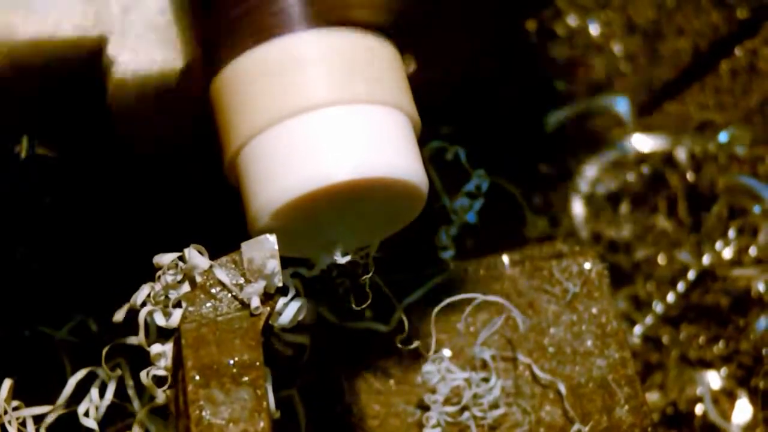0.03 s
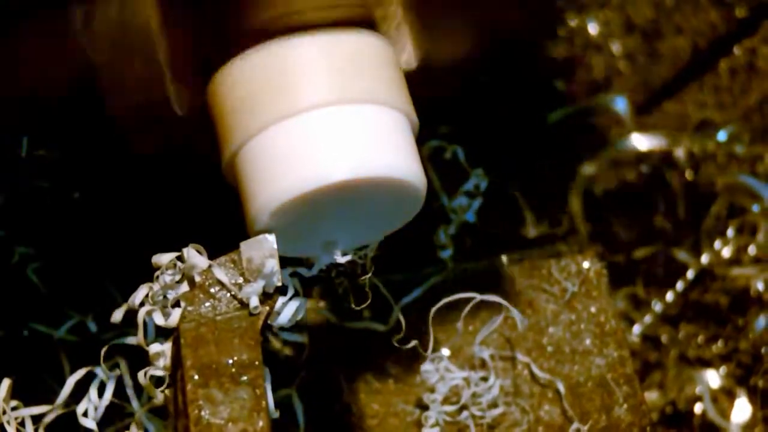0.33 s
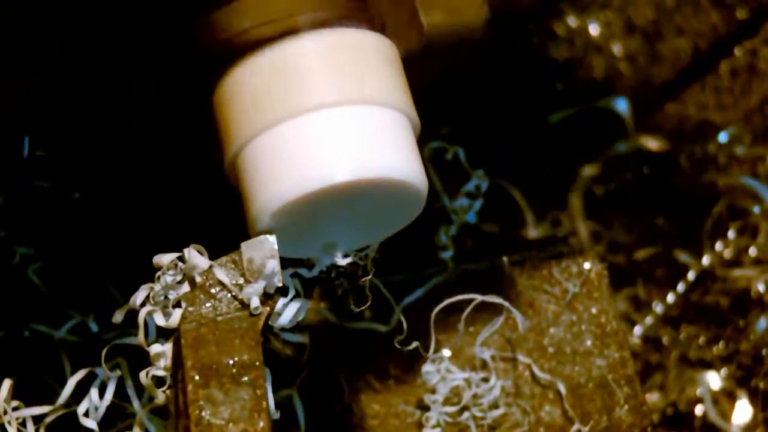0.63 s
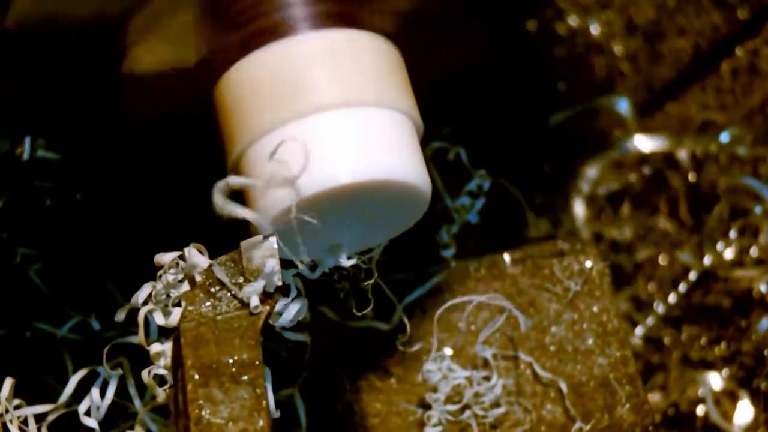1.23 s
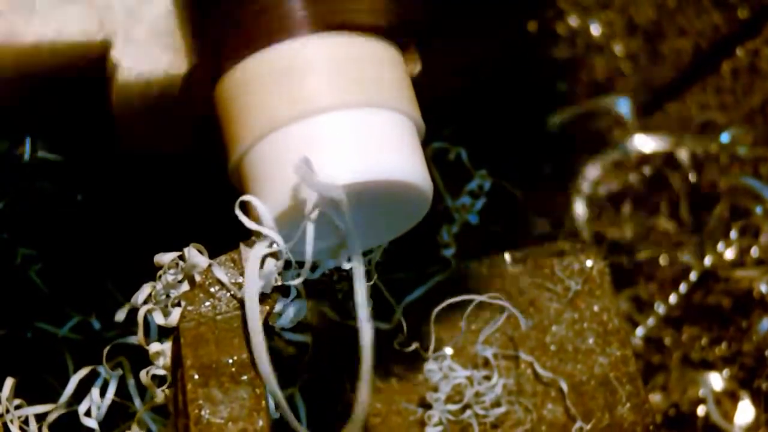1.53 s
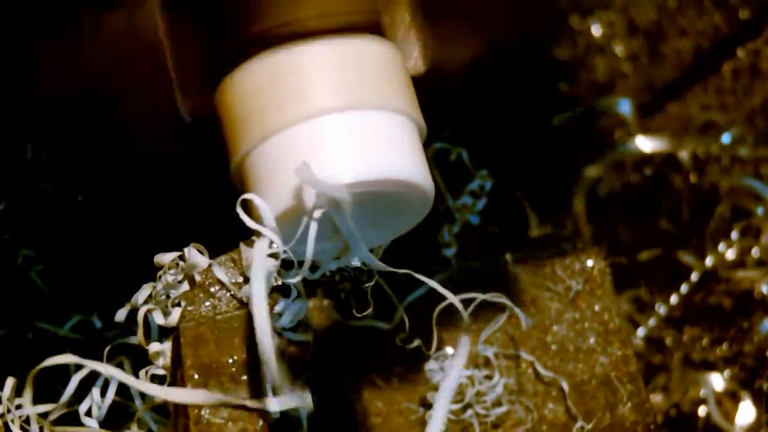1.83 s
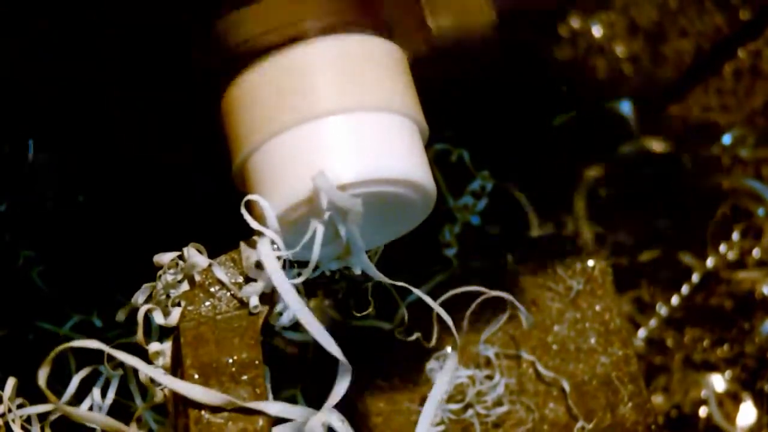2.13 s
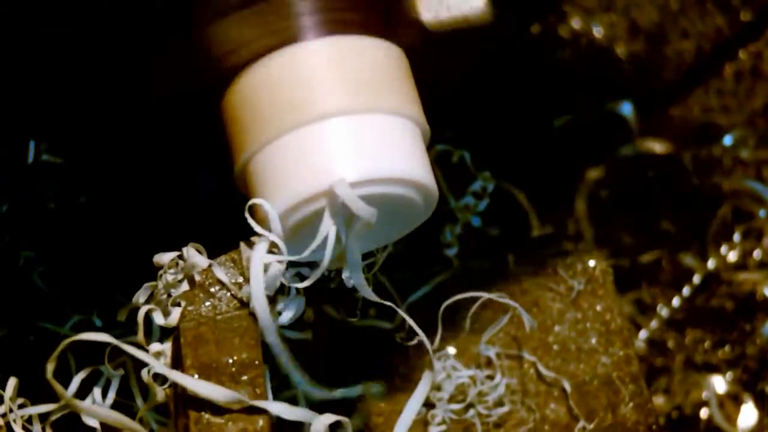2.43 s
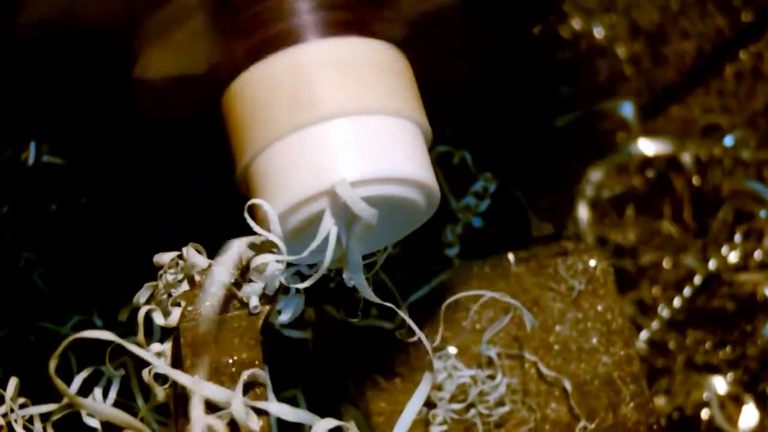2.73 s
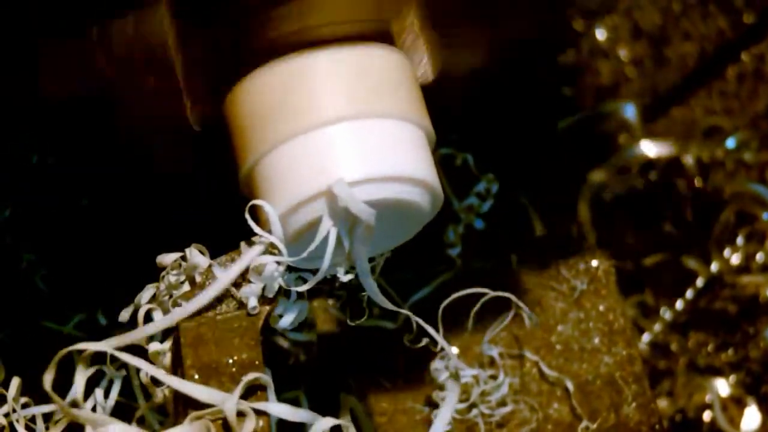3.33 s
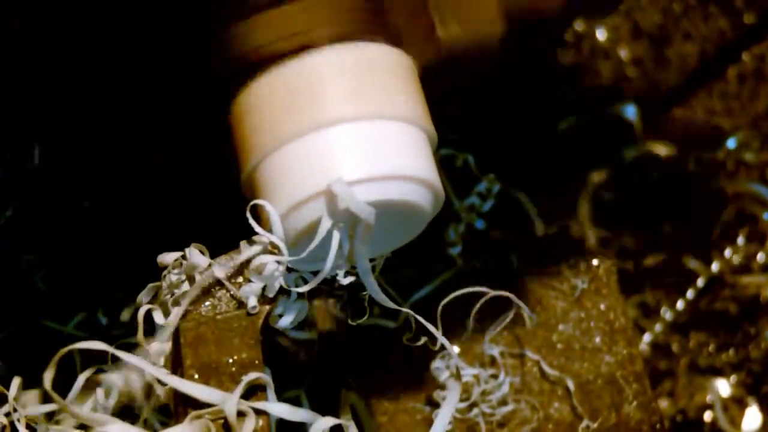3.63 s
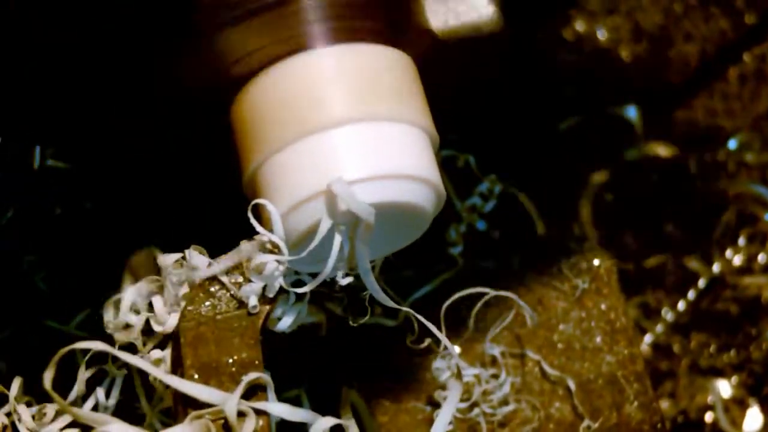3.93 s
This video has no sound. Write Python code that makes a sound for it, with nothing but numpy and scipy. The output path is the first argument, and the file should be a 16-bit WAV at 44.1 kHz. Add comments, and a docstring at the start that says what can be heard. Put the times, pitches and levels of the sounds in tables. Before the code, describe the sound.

A small lathe hums and whines close to the microphone in a workshop. After a second its tool bites into a spinning plastic rod, with a high, rough squeal and hiss that waver and pulse over the motor.

```python
"""A workshop, the microphone close to a small running lathe: motor hum and whine, a throbbing belt drive,
a gearbox grumble and bearing noise, with a low thump at the start. After a second the tool bites into
a spinning plastic rod. The chip hisses and chatters against the edge in a rough squeal that drops fast
in pitch as the cut deepens, then wavers and pulses with each turn of the spindle."""
import sys
import numpy as np
from scipy import signal
from scipy.fft import rfft, irfft
from scipy.io import wavfile
from scipy.ndimage import uniform_filter1d

SR = 44100
rng = np.random.default_rng(int(sys.argv[2]) if len(sys.argv) > 2 else 0)


def dump(signal):
    """Clip the signal to [-1, 1] and save it as 16-bit WAV at the path in sys.argv[1]."""
    limited = np.clip(np.atleast_2d(signal).T, -1, 1)
    pcm = np.round(limited * 32767).astype(np.int16)
    wavfile.write(sys.argv[1], SR, pcm)


N = 176400
TIME = np.arange(N) / SR
SPINDLE_HZ, PULSES_PER_TURN = 7.98, 3
BITE_S = 1.045   # the tool touches the rod


# Where the squeal settles: start_s, pitch_hz
SQUEAL_PITCH = [(1.2, 5100), (1.38, 5050), (1.42, 4830), (1.5, 4750), (1.62, 4780), (1.75, 5030),
                (1.94, 5250), (2.02, 5170), (2.09, 5200), (2.2, 5070), (2.43, 5010), (2.75, 5100),
                (3.03, 5190), (3.28, 5110), (3.57, 5230), (3.68, 5170), (4.0, 5310)]
# Unevenness of the chip's slips: start_s, spread_share_of_pitch
SLIP_JITTER = [(1.2, .007), (1.35, .012), (1.5, .017), (1.9, .017), (2.4, .019), (2.8, .015), (4.0, .013)]
# The partials at the edge, before the tool colours them: start_s, first_db, second_db, third_db
SQUEAL_LEVELS = [(1.08, -26.5, -44, -54), (1.16, -42, -48, -46), (1.24, -29.5, -32.5, -42),
                 (1.32, -30, -31.5, -42), (1.44, -22.5, -25.5, -32), (1.61, -23.5, -26, -32),
                 (1.7, -26.5, -26.5, -37), (1.95, -28.5, -29, -41), (2.45, -27, -26.5, -36),
                 (2.949, -28.5, -29, -40), (3.3, -31.5, -28, -43), (3.7, -35, -32.5, -48),
                 (4.0, -37, -32.5, -49)]
# Texture of each partial: trim_db, pulse_depth_db, pulse_delay_cycles, roughness_share, roughness_hz
SQUEAL_PARTIALS = [(0, 1.4, 0.23, 0.39, 270), (0, 1.36, 0.75, 0.36, 550), (0, 0, 0.54, .6, 650)]
def squeal(bite_extra_hz=9546, settle_s=.047, runout_db=3):
    """The chip sticks and slips on the edge: three rough partials on one unsteady pitch."""
    settled_hz, = in_time(SQUEAL_PITCH)
    bite_hz = bite_extra_hz * np.exp(-np.maximum(TIME - BITE_S, 0) / settle_s)
    load_bend = .0056 * tool_load(delay_cycles=.16)
    waver = .006 * drift(60)
    jitter = in_time(SLIP_JITTER)[0] * drift(263)
    pitch_hz = (settled_hz + bite_hz) * (1 + load_bend + waver + jitter)
    phase = 2 * np.pi * np.cumsum(pitch_hz) / SR
    spindle_angle = 2 * np.pi * SPINDLE_HZ * (TIME - .079)
    dip_db = runout_db * np.exp(1.8 * (np.cos(spindle_angle) - 1))   # a brief dip once a turn
    flicker_db = 1.01 * drift(36)   # the chip's grip comes and goes
    out = 0
    for k, (level_db, texture) in enumerate(zip(in_time(SQUEAL_LEVELS), SQUEAL_PARTIALS), 1):
        trim_db, pulse_db, delay_cycles, roughness, roughness_hz = texture
        grain = 1 + roughness * (drift(roughness_hz) + 1j * drift(roughness_hz))
        partial = reflections(np.real(grain * np.exp(1j * k * phase)))
        partial /= np.sqrt(uniform_filter1d(partial ** 2, size=int(.12 * SR)))   # even out the level
        grip = rms_one(from_db(flicker_db + pulse_db * tool_load(delay_cycles) - dip_db / k ** 2))
        below_nyquist = k * pitch_hz < SR / 2
        out += from_db(level_db + trim_db) * grip * partial * below_nyquist
    return out


# The hiss at the edge, before the tool colours it: start_s, level_db
HISS_LEVEL = [(1.04, -56), (1.09, -39), (1.15, -32), (1.33, -30), (1.47, -34.5), (2.0, -34), (3.0, -35.5),
              (4.0, -36)]
# Colour of the sliding chip: frequency_hz, relative_density_db
HISS_SPECTRUM = [(2500, -18), (3700, -13), (4300, 5), (5400, -9.5), (6100, 1), (7500, 3), (8150, 1),
                 (8800, 10), (9700, 4), (11000, 12), (12100, 2.5), (13000, 6.5), (14500, -4),
                 (16000, -26.5)]
def chip_hiss():
    """The ribbon of plastic slides over the tool, pulsing with the load."""
    level_db, = in_time(HISS_LEVEL)
    pulse_db = 1.5 * tool_load(delay_cycles=.34)
    return from_db(level_db + pulse_db) * noise(HISS_SPECTRUM)


# How the tool and its post radiate towards the microphone: frequency_hz, gain_db
TOOL_RESPONSE = [(4000, -1), (5200, 0), (6000, -3), (8800, -2), (9300, -2), (9720, -9), (10020, 2),
                 (10900, 1), (12000, -3), (14300, 1), (14620, -9), (14900, 0), (16000, -1)]
def cut(attack_s=.038):
    """Squeal and hiss come in as the edge bites, and sound through the tool and its post."""
    contact = np.clip((TIME - BITE_S) / attack_s, 0, 1) ** 2
    return colour(contact * (squeal() + chip_hiss()), TOOL_RESPONSE)


def tool_load(delay_cycles):
    """The load on the tool rises and falls three times a turn."""
    return np.cos(2 * np.pi * (PULSES_PER_TURN * SPINDLE_HZ * TIME - delay_cycles))


def reflections(x, t60_s=.041, wet_db=-.5):
    """The bed and splash guard, close to the tool, add a short, dense tail."""
    age = TIME[:SR // 4]
    tail = rng.standard_normal(len(age)) * from_db(-60 * age / t60_s)
    wet = signal.fftconvolve(x, tail / np.sqrt(np.sum(tail ** 2)))[:N]
    return (x + from_db(wet_db) * wet) / np.hypot(1, from_db(wet_db))


# Tones of the motor and its housing, before the trim: pitch_hz, level_db
MOTOR_TONES = [(49.5, -52.5), (199.8, -41), (249.4, -61), (286.6, -53), (339.1, -57.5), (348.5, -58),
               (599.4, -53.5), (626.9, -50.5), (693.9, -52.5), (767.2, -60), (799.3, -52), (848.8, -55),
               (941.7, -54.5), (999.1, -49.5), (1039.7, -54), (1090.3, -57), (1141.5, -48), (1239.0, -55),
               (1339.7, -48), (1389.3, -51), (1398.7, -50), (1438.9, -46.5), (1486.8, -49.5), (1538.0, -52),
               (1638.7, -46), (1686.7, -46), (1737.8, -51.5), (1798.3, -55), (1886.5, -48.5), (1932.9, -58),
               (2286.1, -61), (2330.9, -65), (2485.9, -54), (2685.8, -63.5), (3112.1, -60.5), (3173.5, -64)]
def motor(trim_db=.5):
    """The motor hums and whines at a nearly steady speed."""
    return from_db(trim_db) * shaft_tones(MOTOR_TONES)


# Tones of the gearbox: pitch_hz, level_db
GEAR_TONES = [(446.1, -58), (479.7, -59), (495.6, -52), (510.3, -49), (515.8, -46), (523.9, -51.5),
              (545.1, -60), (572.1, -61), (594.8, -55.5), (620.6, -58), (1034.3, -53), (1048.0, -54)]
def gearbox():
    """Closely spaced gear tones beat and waver into a grumble."""
    return shaft_tones(GEAR_TONES, waver_db=3, wander=.001)


# Steady tones of the belt drive: multiple_of_turn_rate, level_db
BELT_TONES = [(3, -56), (7, -50), (14, -59.5), (16, -69.5), (21, -59.5)]
# The belt's loudest tone, before its swell: start_s, level_db
THROB_LEVEL = [(0, -44.5), (.45, -43), (.7, -47), (4.0, -46.5)]
def belt(turn_hz=11.13, throb_order=11, throb_depth=.96):
    """The belt hums at multiples of its turning rate; the loudest tone swells once a turn."""
    hum = shaft_tones([(order * turn_hz, db) for order, db in BELT_TONES])
    level_db, = in_time(THROB_LEVEL)
    swell = 1 + throb_depth * np.cos(2 * np.pi * turn_hz * (TIME - .075))
    return hum + from_db(level_db) * swell * sine(throb_order * turn_hz * TIME)


# Colour of the bearings and fan: frequency_hz, relative_density_db
BEARING_SPECTRUM = [(20, 2.5), (35, -10), (100, -6), (220, -11), (330, -1.5), (410, -7), (510, 2),
                    (570, -2), (750, -5), (1030, -3), (1230, -6), (1650, -3.5), (1900, -6), (2200, -6.5),
                    (2800, -13.5), (3150, -14.5), (3600, -20.5), (4600, -16.5), (6200, -25), (6800, -24),
                    (8000, -31), (10300, -36), (12000, -31), (13500, -43), (16000, -43)]
def bearings(level_db=-35.5, buzz_hz=199.7):
    """Bearing and fan noise flutters with the motor's buzz."""
    flutter = 1 + .097 * np.sin(2 * np.pi * buzz_hz * TIME)
    return from_db(level_db) * noise(BEARING_SPECTRUM) * flutter


# Colour of the thump: frequency_hz, relative_density_db
THUMP_SPECTRUM = [(15, -12), (35, -4), (68, -4), (110, -6), (200, -24), (1000, -72)]
def thump(start_s=.0038, level_db=-28, t60_s=.6):
    """A low thump starts abruptly and dies away."""
    age = TIME - start_s
    return from_db(level_db - 60 * age / t60_s) * noise(THUMP_SPECTRUM) * (age > 0)


def side_rumble(level_db=-55.5):
    """A faint, deep wobble, opposite in left and right."""
    return from_db(level_db) * drift(34.5) * np.array([[1], [-1]])


def shaft_tones(rows, waver_db=1.5, wander=.000377):
    """Sines on one shaft whose speed wanders by a small share, each wavering in level."""
    shaft_s = np.cumsum(1 + wander * drift(1.53)) / SR
    return sum(from_db(db + waver_db * drift(3)) * sine(hz * shaft_s) for hz, db in rows)


def sine(cycles):
    """A sine of rms 1 with a random starting phase."""
    return np.sqrt(2) * np.sin(2 * np.pi * (cycles + rng.random()))


def drift(rate_hz):
    """Random motion of rms 1, mostly slower than rate_hz."""
    bins_hz = np.arange(N // 2 + 1) * SR / N
    return rms_one(irfft(rfft(rng.standard_normal(N)) / (1 + (bins_hz / rate_hz) ** 2), N))


def noise(points):
    """Coloured noise of rms 1."""
    return rms_one(colour(rng.standard_normal(N), points))


def colour(x, points):
    """Filter by a smooth curve through (frequency_hz, gain_db) points."""
    hz, db = np.transpose(points)
    bins_hz = np.maximum(np.arange(N // 2 + 1) * SR / N, 1)
    gain = from_db(np.interp(np.log(bins_hz), np.log(hz), db))
    return irfft(rfft(x) * gain, N)


def in_time(rows):
    """Each column after start_s, gliding from row to row at every sample."""
    start_s, *columns = np.transpose(rows)
    return [np.interp(TIME, start_s, column) for column in columns]


def from_db(db):
    """Decibels to gain."""
    return 10 ** (np.asarray(db) / 20)


def rms_one(x):
    """Scale to rms 1."""
    return x / np.sqrt(np.mean(x ** 2) + 1e-20)


def scene():
    """Everything sounds alike in left and right, except a faint, deep wobble that is opposite in the two."""
    return cut() + side_rumble() + motor() + gearbox() + belt() + bearings() + thump()


def record(dry, cutoff_hz=15750):
    """The top of the treble is cut steeply."""
    return signal.sosfilt(signal.ellip(12, .1, 80, cutoff_hz, fs=SR, output="sos"), dry)


dry = scene()
out = record(dry)
dump(out)
```